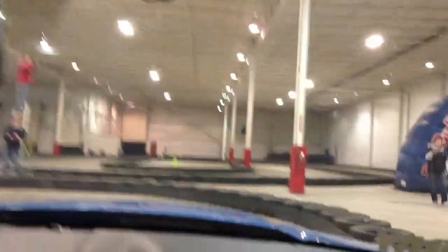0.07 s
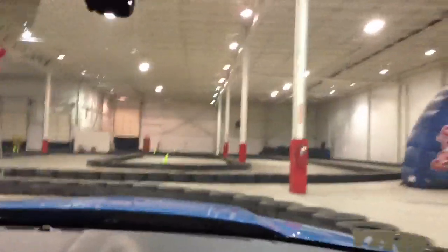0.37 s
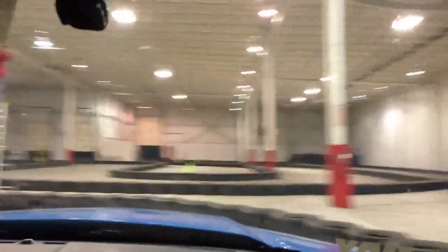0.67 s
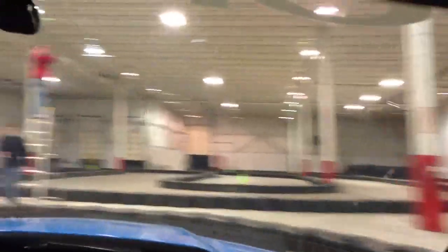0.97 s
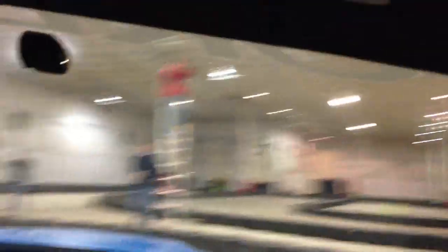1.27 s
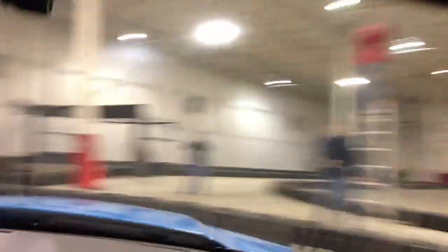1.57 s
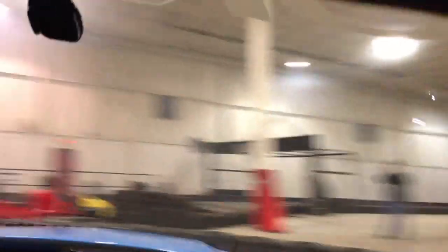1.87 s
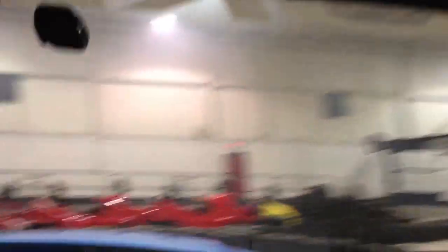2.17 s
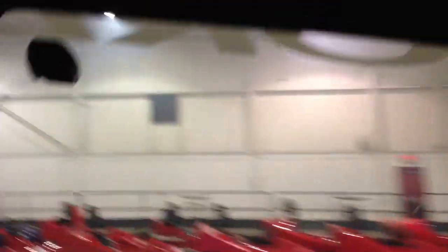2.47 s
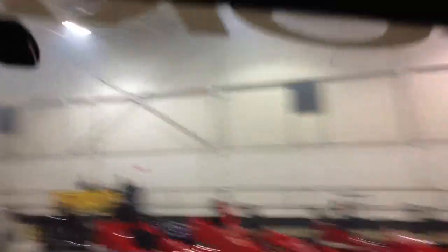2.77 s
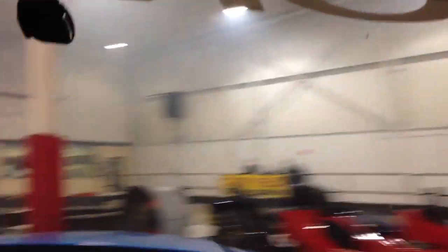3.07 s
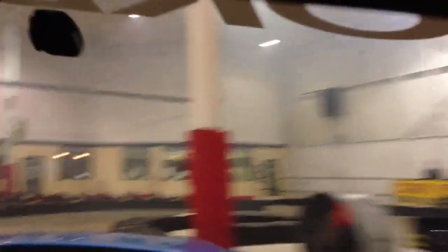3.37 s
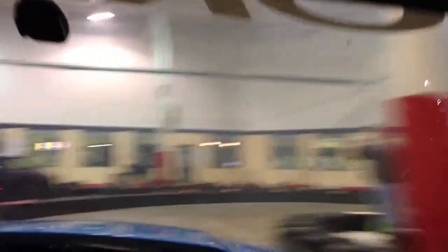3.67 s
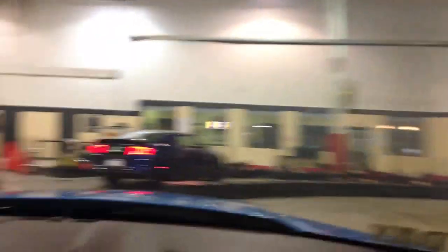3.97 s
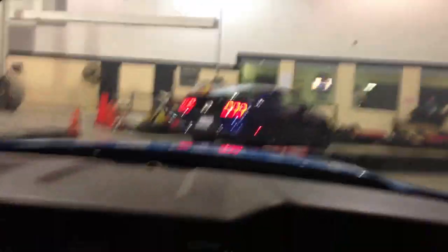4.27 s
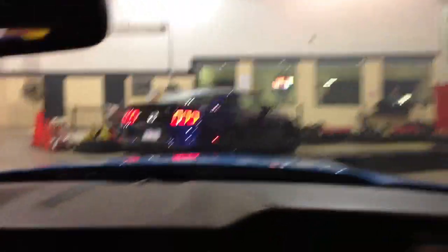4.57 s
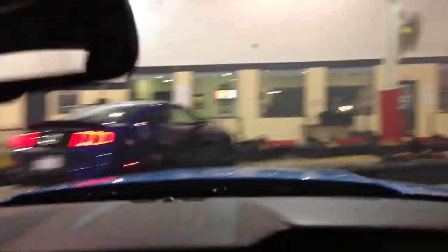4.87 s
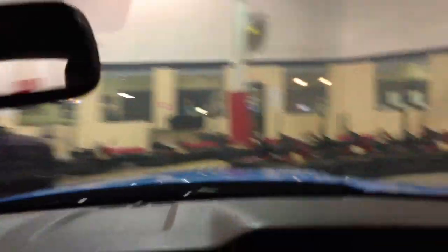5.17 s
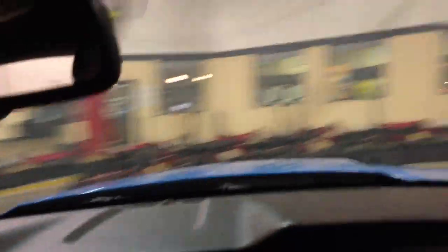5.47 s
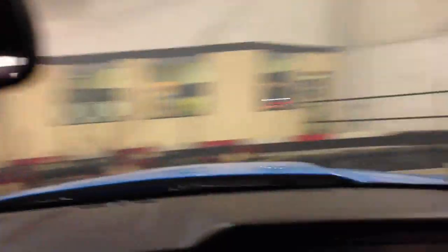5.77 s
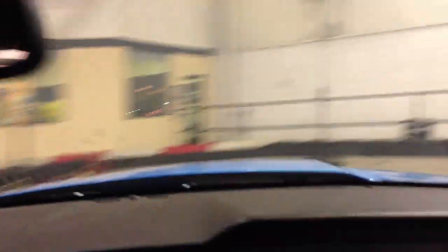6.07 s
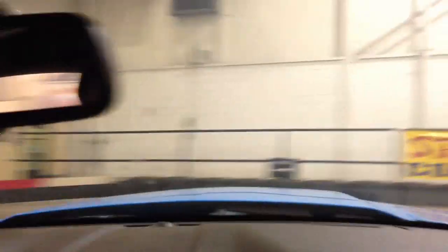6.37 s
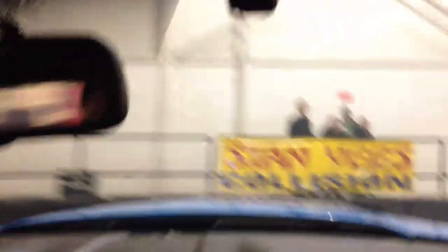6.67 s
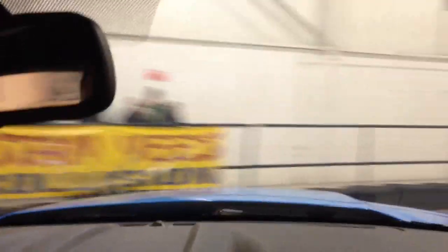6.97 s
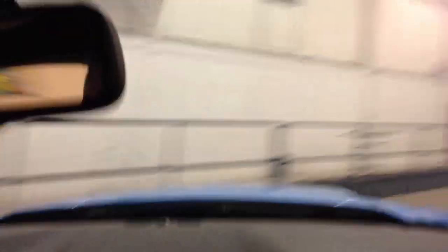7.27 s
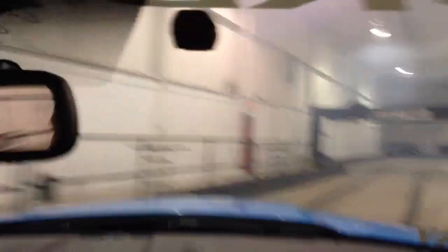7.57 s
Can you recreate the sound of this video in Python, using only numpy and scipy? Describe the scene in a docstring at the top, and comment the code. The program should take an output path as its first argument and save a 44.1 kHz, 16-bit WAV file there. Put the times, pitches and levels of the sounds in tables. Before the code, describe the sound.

A V8 engine drones inside a car cabin while tyres chirp and squeal around an echoing indoor track, ending in wheelspin.

```python
"""A V8 engine booms through the cabin of a car driven round an indoor kart track.
Its uneven firings make a lumpy drone that swells with each stab of the throttle. The tyres grip and
slip on the smooth floor: they chirp and scrub, ring on in the hall, then break into wheelspin.
Something loose clatters and squeaks in the cabin, keys jingle, and the body takes one dull knock."""
import sys
import numpy as np
from scipy import signal
from scipy.fft import rfft, irfft
from scipy.io import wavfile
from scipy.ndimage import uniform_filter1d

SR = 44100
rng = np.random.default_rng(int(sys.argv[2]) if len(sys.argv) > 2 else 0)


def to_wav(sig):
    """Store sig (one row per channel, or 1-D mono) as 16-bit WAV at the path in sys.argv[1].

    Samples outside -1..1 are clipped; the rate is SR.
    """
    pcm = np.clip(np.atleast_2d(sig), -1, 1) * 32767
    pcm = np.round(pcm).astype(np.int16)
    wavfile.write(sys.argv[1], SR, pcm.T)  # frames by channels


N = 335601
T = np.arange(N) / SR


# engine speed, in four-stroke cycles a second: t/s, f/Hz
ENGINE_SPEED = [(0, 16.8), (.33, 14.35), (.9, 13.3), (1.06, 16.2), (1.36, 17.26), (1.8, 15.06),
                (2.15, 15.15), (2.36, 16.4), (2.85, 14.25), (3.25, 16.5), (3.44, 16.2), (3.8, 16.66),
                (4.35, 17.2), (5.0, 15.75), (5.3, 16.6), (5.78, 15.3), (6.12, 17.5), (6.35, 16.86),
                (7.18, 17.25), (7.45, 23.6), (7.61, 28.4)]
# the exhaust's tones (the 8th is the firing rate): multiple of engine speed, level/dB
EXHAUST_TONES = [(1, -12), (6, -3), (7, -2), (8, 4.5), (9, -9), (10, -6), (11, -3), (12, -10.5), (13, -7),
                 (15, -4.5), (16, -12.5), (17, -11), (18, -1.5), (19, -2), (20, -13), (21, -4.5),
                 (24, -6.5), (48, 2)]
# how the cabin shapes the exhaust: f/Hz, level/dB
CABIN_BOOM = [(40, -39.5), (98, -22.5), (116, -15), (130, -2.5), (160, 4.5), (190, -0.5), (225, -6),
              (268, -10.5), (305, -5), (345, -6.5), (385, -14), (450, -16.5), (540, -36), (1200, -60)]

def engine(exhaust_db, throb, waver_db=2.5, drift_rad=.37, rev_db_per_hz=1.55, load_tilt=.2):
    """Uneven firings make tones at multiples of engine speed; they boom in the cabin and echo."""
    speed = engine_speed()
    cycle_phase = 2 * np.pi * np.cumsum(speed) / SR
    coarse = slice(None, None, SR // 200)  # slow changes need only 200 points a second
    t, rate = T[coarse], speed[coarse]
    boom_hz, boom_db = np.transpose(CABIN_BOOM)
    drone = np.zeros(N)
    for k in range(5, 32):
        hz = k * rate
        db = np.interp(k, *np.transpose(EXHAUST_TONES))
        db += np.interp(np.log(hz), np.log(boom_hz), boom_db)
        # high revs bring out the upper tones
        db += rev_db_per_hz * np.maximum(rate - 17.5, 0) * np.clip(np.log2(hz / 250), 0, 1)
        # when the engine works hard, the boom outgrows them
        db -= load_tilt * (exhaust_db[coarse] - COAST_DB) * np.clip(np.log2(hz / 150), 0, 1)
        db += waver_db * unit(uniform_filter1d(noise(len(t)), 24))
        # pipes and passing walls delay each tone differently, smearing the pulses into a drone
        drift = unit(uniform_filter1d(uniform_filter1d(noise(len(t)), 70), 70))
        delay = rng.uniform(0, 2 * np.pi) + drift_rad * drift
        drone += np.interp(T, t, undb(db)) * np.sin(k * cycle_phase + np.interp(T, t, delay))
    # off the throttle, more of the sound is rushing gas
    gas = shaped_noise(CABIN_BOOM) * undb(-32 - exhaust_db)
    boom = (steady(drone, .45) + gas) * (1 + throb * np.cos(cycle_phase)) * undb(exhaust_db)
    return steady(boom + undb(-13) * hall(boom), .16) * undb(exhaust_db)


COAST_DB, COAST_THROB = -30.5, .13  # the exhaust with the pedal up
# stabs of the pedal: press t/s, rise/s, lift t/s, release/s, level/dB, added throb (0-1)
PEDAL_STABS = [(-.1, .12, 0.18, 0.041, -26.5, 0.02), (.9, 0.27, 1.444, 0.3, -16, 0.18),
               (2.2, 0.2, 2.53, 0.15, -24.5, 0), (3.28, 0.17, 3.97, 0.28, -19.5, 0),
               (4.08, 0.12, 4.23, 0.07, -21.5, 0), (4.78, 0.2, 5.33, 0.37, -19, 0.17),
               (5.909, 0.15, 6.8, .3, -21, 0), (6.9, .14, 7.7, .3, -22.5, 0.04),
               (7.09, 0.19, 9.3, .5, -11.5, 0)]

def throttle(sag_db_per_s=2):
    """Exhaust level and throb: each stab rises, eases while held and dies back to coasting."""
    boost_db, added_throb = np.zeros(N), np.zeros(N)
    for press, rise, lift, release, db, throb in PEDAL_STABS:
        pedal = np.clip((T - press) / rise, 0, 1) * np.exp(-np.maximum(T - lift, 0) / release)
        held_s = np.maximum(np.minimum(T, lift) - press - rise, 0)
        boost_db = np.maximum(boost_db, pedal * (db - COAST_DB - sag_db_per_s * held_s))
        added_throb = np.maximum(added_throb, pedal * throb)
    return COAST_DB + boost_db, COAST_THROB + added_throb


def engine_speed():
    """Engine cycles a second at every moment."""
    return np.interp(T, *np.transpose(ENGINE_SPEED))


def stick_slip(hz, overtone_db, rough, spread=.06, flutter_db=6, stutter_db=2, blur=.98, fall_db=-9):
    """Tread blocks grip and let go: the rougher the slip, the more pitch and loudness shake."""
    size = len(hz)
    stagger = .9 * wander(420, size) + .3 * wander(70, size)
    phase = 2 * np.pi * np.cumsum(hz * (1 + spread * rough * stagger)) / SR
    tone = np.sin(phase)
    for k in range(2):
        # the blocks slip out of step, which blurs the overtones
        smear = blur * np.sqrt(rough) * wander(450, size)
        tone += undb(overtone_db + fall_db * k) * np.sin((k + 2) * phase + smear)
    shake_db = rough * (flutter_db * wander(160, size) + stutter_db * wander(39.95, size))
    return np.sqrt(2) * tone * undb(shake_db)


# tyre chirps: t/s, length/s, first f/Hz, last f/Hz, level/dB, overtone/dB, roughness (0-1)
TYRE_CHIRPS = [(1.128, 0.091, 1240, 1353, -37, -6, .58), (1.62, .076, 1643, 1768, -44.5, -24, 0.48),
               (1.654, 0.095, 1880, 2094, -51, -17, .13), (1.905, 0.06, 1698, 1526, -36.5, -22, 0.64),
               (2.08, .07, 1599, 1474, -51.5, -19, 0.4), (2.264, 0.11, 1230, 1274, -45.5, -11, 0.45),
               (2.421, 0.074, 1386, 1528, -42.5, -12, 0.45), (2.812, .055, 1687, 1760, -39, -3, 0.33),
               (3.4, 0.078, 1850, 1736, -49.5, -15, .4), (3.473, 0.039, 1630, 1523, -37.5, -10, 0.44),
               (3.9, 0.037, 1391, 1386, -47.5, -4, 0.3), (4.8, 0.093, 2810, 2780, -58.5, -14, .05),
               (4.998, 0.042, 1520, 1470, -33.5, -11, 0.41), (5.076, 0.04966, 1448, 1530, -37.5, -11, .43),
               (5.16, 0.049, 1438, 1495, -48, -25, 0.4), (5.267, .02, 1487, 1570, -38.5, -16.5, .3),
               (5.271, 0.33, 1790, 1887, -49.5, -15.5, .54), (5.66, .15, 1805, 1850, -53.5, -17, 0.56),
               (6.131, 0.076, 1432, 1510, -35, -2.5, 0.6), (6.26, 0.18, 1780, 1715, -44, -9.5, 0.57),
               (7.28, 0.091, 1485, 1520, -27.5, -13.5, 0.56), (7.359, 0.0587, 1494, 1432, -14.5, -23, 0.03),
               (7.402, 0.044, 1443, 1404, -21.5, -7, 0.3)]

def chirps():
    """Short slips of one tyre, which hang in the hall."""
    out = np.zeros(N)
    for start, length, first_hz, last_hz, db, overtone_db, rough in TYRE_CHIRPS:
        size = int(length * SR)
        hz = np.linspace(first_hz, last_hz, size)
        tone = stick_slip(hz, overtone_db, rough, spread=.0608, blur=1, fall_db=-22 + 23.4 * rough)
        add(out, start, undb(db) * unit(tone) * signal.windows.tukey(size, .3))
    return out + undb(-2) * hall(out)


# hiss of rubber dragged sideways: f/Hz, level/dB
SCRUB_HISS = [(700, -14), (1300, 4.5), (2500, -1), (4300, -6.5), (6500, -18), (12000, -33)]
# slides in the turns: t/s, rise/s, hold/s, f/Hz, glide/(Hz/s), relative level/dB, overtone/dB
TURNS = [(0, 0.0033, 0, 1393, -170, -40.5, -10.5), (1.101, 0.044, 0.27, 1334, 60, -39.5, -10),
         (2.501, 0.13, 0, 1309, 150.5, -46, -11), (4.98, .08, .02, 1528, 151, -47.5, -16),
         (6.15, 0.2, 0.23, 1529, -70, -41.5, -17.5), (7.101, 0.42, .1, 1491, -180, -29.5, -13)]

def scrub(pitch_split=.045, fade_db_per_s=14.5):
    """Inner and outer tyres hiss and sing at slightly different pitches; each turn swells and fades."""
    out, t = np.zeros(N), T[:int(1.6 * SR)]
    for start, rise, hold, hz, glide, db, overtone_db in TURNS:
        song = np.zeros(len(t))
        for side in (-1, 1):
            pitch = (hz + glide * t) * (1 + side * pitch_split)
            song += stick_slip(pitch, overtone_db, rough=.85, spread=.07, stutter_db=4, fall_db=-13.5)
        hiss = undb(-9) * shaped_noise(SCRUB_HISS, len(t))
        fade_db = fade_db_per_s * np.maximum(t - rise - hold, 0)
        add(out, start, (unit(song) + hiss) * np.minimum(t / rise, 1) * undb(db - fade_db))
    return undb(-4) * out + undb(-3) * hall(out)


# rasp of tearing rubber: f/Hz, level/dB
RUBBER_RASP = [(400, -1), (900, -6), (1250, 10), (1800, 4), (2200, -23), (2700, -1), (3400, -7),
               (3900, 5.5), (4700, -13.5), (5250, -3.5), (6000, -17.5), (9000, -30.5), (15000, -49)]

def wheelspin(start_s=7.22, rise_s=.25, start_hz=1475, sag_hz_per_s=330):
    """The driven tyres break loose: a sinking scream and a rasp build up together, then hold."""
    t = np.maximum(T - start_s, 0)
    tone = stick_slip(start_hz - sag_hz_per_s * t, overtone_db=-6, rough=.542, flutter_db=3.5, blur=.6)
    rasp = unit(colour(noise(), RUBBER_RASP) * undb(1.4 * wander(250))) * undb(-5.5)
    scream = (tone + rasp) * undb(-24.5) * np.minimum(t / rise_s, 1) ** 2
    return scream + undb(-7) * hall(scream)


# body shudder, road roar and rubber hiss, each: f/Hz, level/dB
BODY_SHUDDER = [(12, -18.5), (35, -6), (80, 3), (115, 10), (250, -66.5)]
ROAD_ROAR = [(100, 1.5), (400, 9.5), (700, 6), (1000, -1.5), (2000, -2.5), (3200, -15.5), (6000, -36)]
RUBBER_HISS = [(800, 4.5), (2200, 4.5), (4000, 1.5), (5200, -3), (7000, -9.5), (10000, -14.5),
               (15000, -22.5)]
# jolts of the suspension: middle t/s, length/s, level/dB
SUSPENSION_JOLTS = [(1.0, 0.043, -33), (1.185, 0.044, -26), (1.272, .05, -25), (1.36, 0.038, -26),
                    (1.7, .07, -42), (3.42, .12, -38), (4.02, .08, -40), (5.03, .085, -35),
                    (5.29, .06, -42), (5.445, .052, -38), (6.2, .14, -41), (6.45, .12, -40),
                    (7.26, 0.076, -39.5), (7.6, .04, -31.5)]

def road(exhaust_db, grip_hz=17.05):
    """The body shudders with the engine and each jolt; as the wheels spin, roar grows and hiss eases."""
    slip_hz = np.maximum(engine_speed() - grip_hz, 0)
    shudder = steady(colour(noise(), BODY_SHUDDER), .075)
    shudder *= undb(exhaust_db - 21 + 2.8 * wander(17)) + swells(SUSPENSION_JOLTS)
    roar_db = -47 + .3771 * (exhaust_db - COAST_DB) + 1.27 * slip_hz
    roar = shaped_noise(ROAD_ROAR) * undb(roar_db + wander(30))
    hiss = shaped_noise(RUBBER_HISS) * undb(-52 - .3 * slip_hz + 1.8 * wander(35))
    return shudder + roar + hiss


# bounces of a loose plastic thing: t/s, level/dB, f/Hz, ring time/s
PLASTIC_BOUNCES = [(0.3236, -19.5, 3530, 0.098), (0.3347, -30, 2830, 0.053), (0.339, -25, 3600, 0.045),
                   (0.353, -23, 4900, 0.067), (.364, -21, 4800, 0.043), (0.3974, -30, 2900, 0.16),
                   (0.405, -28, 6530, 0.095), (0.418, -22, 4400, 0.035), (4.61, -35.5, 3830, .04)]

def clatter():
    """Hard plastic skips and scrapes: short gritty bursts round one broad ring."""
    out, t = np.zeros(N), T[:SR // 8]
    for start, db, hz, ring_s in PLASTIC_BOUNCES:
        grit = noise(len(t)) * undb(3 * wander(900, len(t)))
        peak = [(hz / 5, -30), (hz * .4, -8), (hz, 0), (hz * 2, -13), (16000, -30)]
        add(out, start, undb(db - 60 * t / ring_s) * unit(colour(grit, peak)))
    return out


# taps on the trim: t/s, level/dB
TRIM_TAPS = [(.3955, -23), (.414, -27.5)]
# the trim's notes: f/Hz, level/dB, ring time/s
TRIM_NOTES = [(1090, 13, 0.028), (1274, 4, 0.061)]

def taps():
    """The loose thing lands on hollow trim, which rings briefly."""
    return strikes(TRIM_TAPS, TRIM_NOTES, scatter_db=1, detune=.01)


# a knock and its faint follower: t/s, relative level/dB
BODY_KNOCKS = [(4.7215, -17), (4.741, -34)]
# the panel's notes: f/Hz, level/dB, ring time/s
PANEL_NOTES = [(227, -16, 0.028), (373.6, -8, 0.018), (456, 4, 0.009)]

def knock():
    """A struck panel sounds dull through the car's body."""
    panel = strikes(BODY_KNOCKS, PANEL_NOTES, scatter_db=1, detune=.02)
    return colour(panel, [(80, -22), (200, 8), (550, 1.5), (1000, -32), (3000, -45)])


# keys touching: t/s, relative level/dB
KEY_TOUCHES = [(4.087, -57.5), (4.113, -34.5), (4.125, -36.5), (4.175, -43), (4.34, -49), (4.358, -47),
               (4.382, -39), (4.44, -48), (4.538, -42.5), (4.592, -46), (4.609, -60), (4.663, -52),
               (4.692, -53)]
# the keys' notes: f/Hz, level/dB, ring time/s
KEY_NOTES = [(6900, -2, 0.095), (8218, -3, 0.058), (10600, -3, .05), (11220, -12, .05), (12200, 1, 0.088),
             (12600, -7, 0.048), (13000, -9, 0.067), (14400, -4, 0.064), (15110, 3, 0.06)]

def keys():
    """Keys swing together: a dry scrape and a short high ring."""
    rings = strikes(KEY_TOUCHES, KEY_NOTES, scatter_db=4, detune=.022)
    ticks = swells([(start + .007, .016, db - 1) for start, db in KEY_TOUCHES])
    scrape = shaped_noise([(3000, -8), (7000, 2), (10000, -4), (12500, -6), (15000, -5)])
    return .5 * (rings + ticks * scrape)


# soft slides in the cabin: middle t/s, length/s, level/dB
SOFT_SLIDES = [(.28, 0.2, -46), (.57, 0.31, -53.5), (.98, 0.069, -45), (1.195, 0.088, -44),
               (2.74, 0.18, -52), (3.535, 0.091, -52.5), (4.09, 0.068, -46), (4.275, 0.14, -47),
               (4.98, 0.043, -52), (5.285, .02, -52), (6.58, 0.021, -53)]

def brushes():
    """Light things slide over the trim as the car turns."""
    grit = noise() * undb(2 * wander(400))
    return swells(SOFT_SLIDES) * unit(colour(grit, [(1200, -1), (4800, 1), (8000, -5), (15000, -12.5)]))


# thin squeaks in the cabin: middle t/s, length/s, level/dB
CABIN_SQUEAKS = [(.15, .14, -52), (4.25, 0.19, -49)]

def squeaks():
    """A faint, unsteady, very high whistle."""
    hz = 13200 + 130 * wander(900)
    return swells(CABIN_SQUEAKS) * np.sin(2 * np.pi * np.cumsum(hz) / SR)


def hall(x, low_ring_s=3.26, high_ring_s=3):
    """The big hall's wash of echoes; air makes the treble die sooner."""
    t = T[:2 * SR]
    echoes = noise(len(t))
    low = signal.sosfilt(signal.butter(2, 2500, fs=SR, output="sos"), echoes)
    high = signal.sosfilt(signal.butter(2, 2500, "high", fs=SR, output="sos"), echoes)
    tail = low * undb(-60 * t / low_ring_s) - high * undb(-60 * t / high_ring_s)
    tail *= 1 - np.exp(-t / .0028)
    return signal.fftconvolve(x, tail / np.linalg.norm(tail))[:N]


def strikes(hits, notes, scatter_db, detune):
    """Each hit rings the same notes in its own mix, a little off pitch; ring time is a 60 dB fade."""
    out, t = np.zeros(N), T[:SR // 4]
    hz, db, ring_s = np.transpose(notes)[:, :, None]
    for start, hit_db in hits:
        balance, shift = noise((2, len(hz), 1))
        gain = undb(db + scatter_db * balance)
        ring = gain * np.sin(2 * np.pi * hz * (1 + detune * shift) * t) * undb(-60 * t / ring_s)
        add(out, start, undb(hit_db) * ring.sum(0) * 2 / np.linalg.norm(gain))
    return out


def swells(table):
    """Smooth rises and falls from rows of middle t/s, length/s, level/dB."""
    out = np.zeros(N)
    for middle, length, db in table:
        add(out, middle - length / 2, undb(db) * np.hanning(int(length * SR)))
    return out


def colour(x, points, size=8192):
    """Shape bass and treble along points of f/Hz, level/dB."""
    hz, db = np.transpose(points)
    gain = undb(np.interp(np.log(np.arange(size // 2 + 1) * SR / size + 1), np.log(hz), db))
    # make the filter ring only after a sound, never before
    cepstrum = irfft(np.log(gain))
    cepstrum[1:size // 2] *= 2
    cepstrum[size // 2 + 1:] = 0
    return signal.oaconvolve(x, irfft(np.exp(rfft(cepstrum))))[:len(x)]


def shaped_noise(points, size=N):
    """Coloured noise at level 1."""
    return unit(colour(noise(size), points))


def noise(size=N):
    """White noise."""
    return rng.standard_normal(size)


def wander(rate, size=N):
    """A smooth random wobble of size 1, changing rate times a second."""
    step = max(int(SR / rate), 1)
    return unit(uniform_filter1d(np.repeat(noise(size // step + 2), step), step))[:size]


def steady(x, window_s):
    """Hold the short-term level at 1."""
    return x / np.sqrt(uniform_filter1d(x ** 2, int(window_s * SR)) + 1e-12)


def unit(x):
    """Scale to an average (rms) level of 1."""
    return x / np.sqrt(np.mean(x ** 2) + 1e-18)


def undb(db):
    """Decibels to gain."""
    return 10 ** (np.asarray(db) / 20)


def add(out, start_s, x):
    """Mix a short sound in."""
    i = max(int(start_s * SR), 0)
    out[i:i + len(x)] += x[:max(N - i, 0)]


def scene():
    """Engine, tyres and loose things, all heard from one seat."""
    exhaust_db, throb = throttle()
    exhaust = engine(exhaust_db, throb)
    tyres = chirps() + scrub() + wheelspin() + road(exhaust_db)
    cabin = clatter() + taps() + knock() + keys() + brushes() + squeaks()
    return (exhaust + tyres + cabin)[None]


def record(dry, top_hz=15250):
    """The microphone rounds only the loudest peaks and cuts the highest treble."""
    rounded = dry / (1 + dry ** 6) ** (1 / 6)
    return signal.sosfilt(signal.ellip(10, .2, 80, top_hz, fs=SR, output="sos"), rounded)


dry = scene()
out = record(dry)
to_wav(out)
```